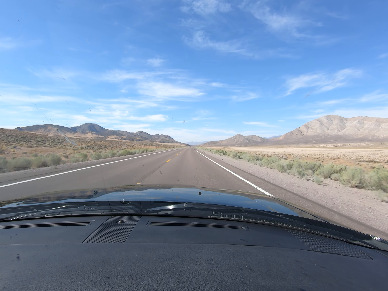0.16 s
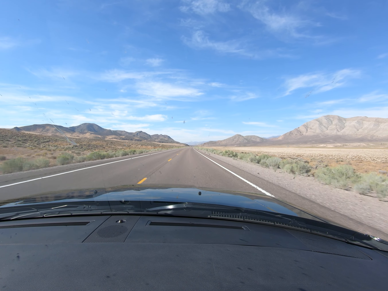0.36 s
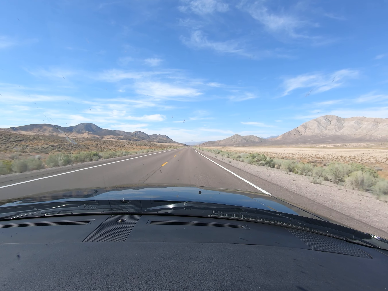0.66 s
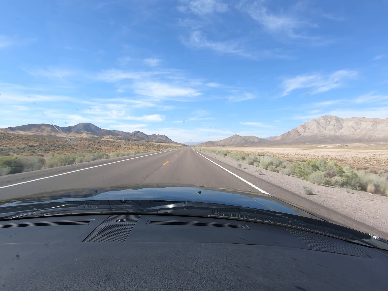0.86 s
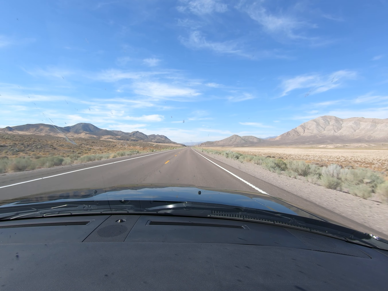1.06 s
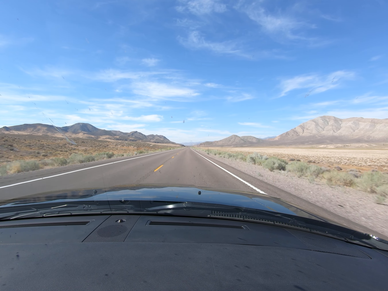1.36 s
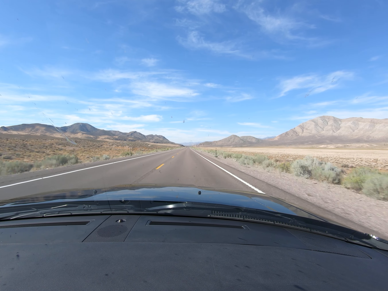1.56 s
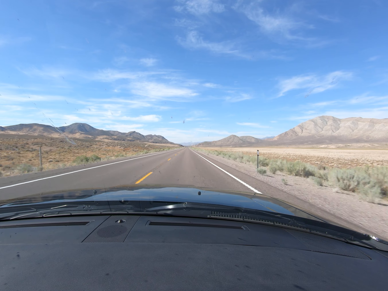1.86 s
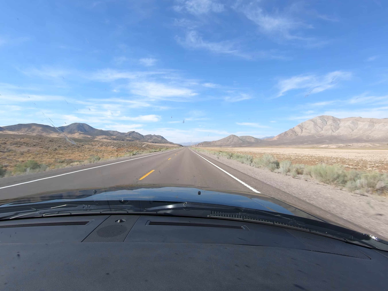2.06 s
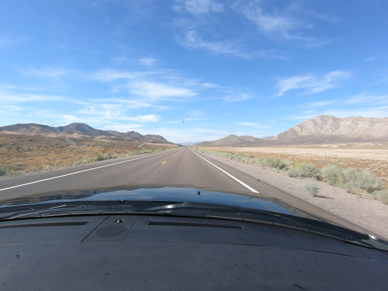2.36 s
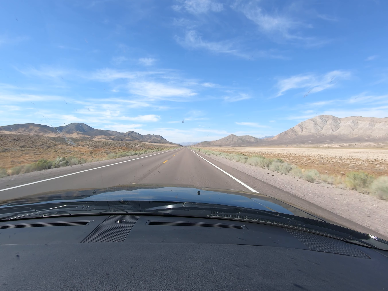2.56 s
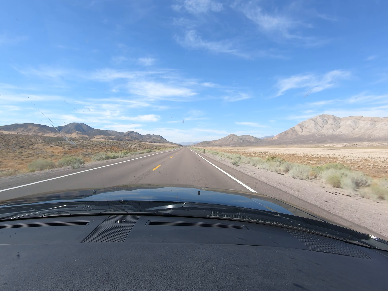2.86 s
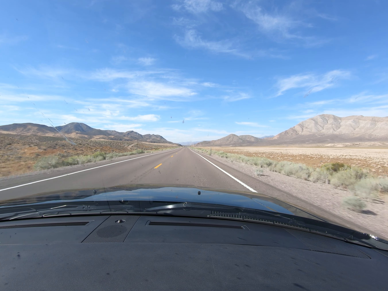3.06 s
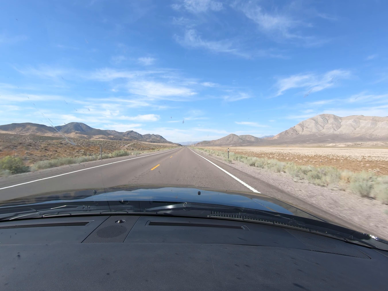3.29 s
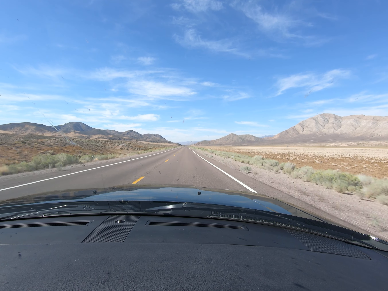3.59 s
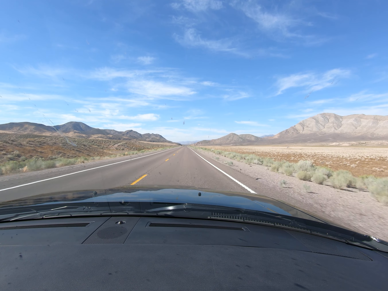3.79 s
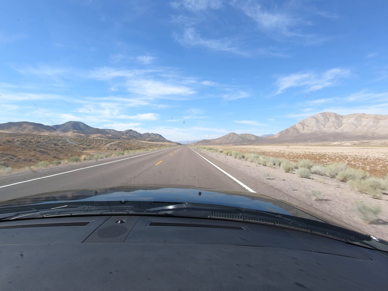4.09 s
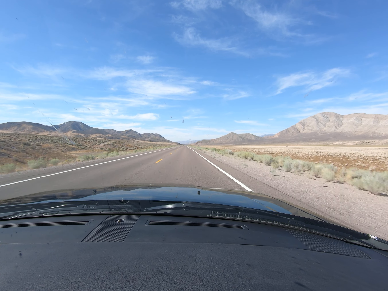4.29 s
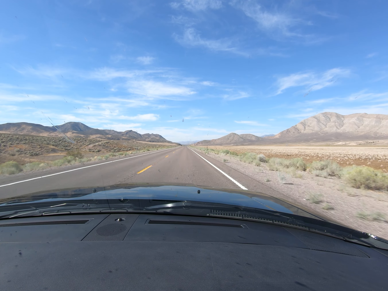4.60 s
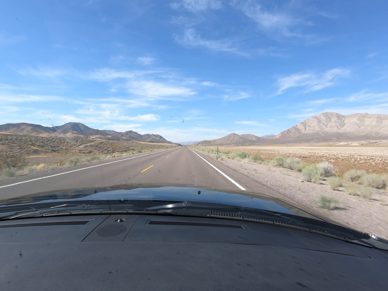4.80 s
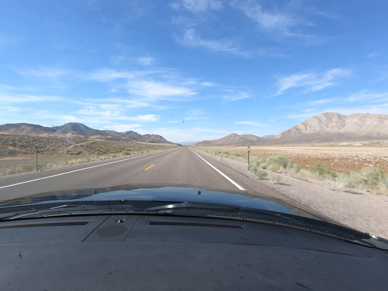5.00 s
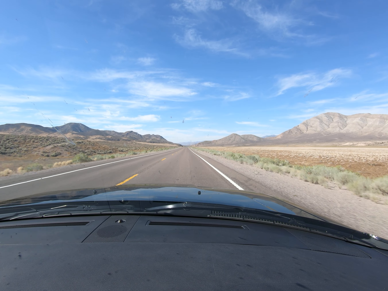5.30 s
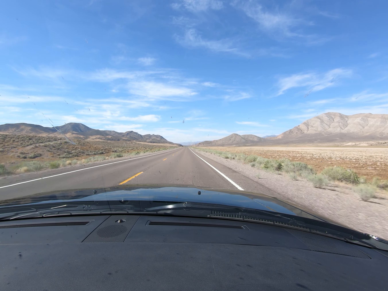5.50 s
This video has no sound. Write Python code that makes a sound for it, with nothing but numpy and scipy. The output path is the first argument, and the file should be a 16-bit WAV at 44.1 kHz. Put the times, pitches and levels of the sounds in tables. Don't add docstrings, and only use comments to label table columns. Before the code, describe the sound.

Continuous highway drive heard from the cabin: thick low rumble, muffled tyre roar and thin air hiss at the windscreen. The driver holds the throttle from about half a second to three seconds, adding a low engine hum with barely rising pitch, then lifts off. Hanging keys click faintly at the start, around two seconds and after the release; soft dash rubs follow past four seconds. Close, boxy sound with squeezed bass and dull, slightly thinned treble.

```python
import sys
import numpy as np
from scipy import signal
from scipy.fft import rfft, irfft, next_fast_len
from scipy.io import wavfile
from scipy.ndimage import uniform_filter1d, map_coordinates

SR = 44100
rng = np.random.default_rng(int(sys.argv[2]) if len(sys.argv) > 2 else 0)


def boost(x):
    u = np.asarray(x, float) / 20
    return 10 ** u


def inscribe(sig):
    pcm = np.round(np.clip(np.atleast_2d(sig).T, -1, 1) * 32767)
    wavfile.write(sys.argv[1], SR, pcm.astype(np.int16))


N = 249165

LIFT_S, PEDAL_S = 3.24, 0.35
CRUISE_HZ = 35.3


def clock():
    return np.arange(N) / SR


def unit(x):
    return x / np.sqrt(np.mean(x ** 2) + 1e-20)


def wobble(rate):
    knots = rng.standard_normal(int(N * rate / SR) + 4)
    return map_coordinates(knots, [np.arange(N) * rate / SR])


def noise(response):
    m = next_fast_len(N + 8192)
    spectrum = rfft(rng.standard_normal(m)) * response(np.fft.rfftfreq(m, 1 / SR))
    return unit(irfft(spectrum, m)[:N])


def coloured(points):
    f, db = np.transpose(points)
    return noise(lambda hz: boost(np.interp(np.log(hz + 1), np.log(f + 1), db, -120, -120)))


def patchy(x, patchy_db):
    z = signal.stft(x, nperseg=2048)[2]
    field = uniform_filter1d(rng.standard_normal(z.shape), size=8, axis=0)
    field = uniform_filter1d(field, size=11, axis=1)
    return unit(signal.istft(z * boost(patchy_db * unit(field)), nperseg=2048)[1][:N])


def tone(hz):
    return np.sqrt(2) * np.sin(2 * np.pi * (np.cumsum(hz) / SR + rng.random()))


def throttle():
    t = clock()
    press_s = 0.6
    return np.clip(0.5 + np.minimum(t - press_s, LIFT_S - t) / PEDAL_S, 0, 1)


def shaft():
    start_hz, gain_hz_per_s = 34.19, 0.615
    sag_hz, sag_s = 0.65, 0.55
    coast = np.maximum(clock() - LIFT_S + PEDAL_S / 2, 0)
    return start_hz + gain_hz_per_s * (clock() - coast) - sag_hz * (1 - np.exp(-coast / sag_s))


def asphalt():
    # time in seconds, length in seconds, jolt in dB, slap in dB.
    uneven_spots = [(0.122, 0.042, 1.5, 0), (0.521, 0.04, 9, -1), (0.686, 0.066, 2, -0.5),
                    (1.303, .1, 1.5, -0.6), (1.898, 0.12, 5.5, 0.5), (2.45, 0.11, 3.5, 0.5),
                    (2.9, 0.069, 1, 1.3), (3.339, 0.14, 1, 1.05), (4.15, 0.098, 1, 0.5),
                    (5.197, .1, 1.5, -1), (5.504, 0.13, 2, 2)]
    s, length, jolt_db, slap_db = np.transpose(uneven_spots)
    spots = np.exp(-((clock()[:, None] - s) / length) ** 2)
    return spots @ jolt_db, spots @ slap_db


def lull(x):
    middle_s, length_s, share = 0.45, 0.22, 0.7
    # lower edge in Hz, upper edge in Hz.
    panel_band = [335, 420]
    panel = signal.sosfiltfilt(signal.butter(2, panel_band, "band", fs=SR, output="sos"), x)
    return x - share * np.exp(-((clock() - middle_s) / length_s) ** 4) * panel


def road():
    # frequency in Hz, density in dB per Hz.
    thump_colour = [(7.1, -46.5), (12, -18.5), (25, -4.5), (37, -1), (64, -1), (77, -0.5), (90, -9.5),
                    (120, -43.5), (200, -120)]
    # frequency in Hz, density in dB per Hz.
    boom_colour = [(70, -43.5), (85, -7), (105, 3.5), (128, 1.5), (155, -6), (200, -6), (260, -10),
                   (330, -23), (380, -50)]
    # frequency in Hz, density in dB per Hz.
    roar_colour = [(180, -37), (300, -3.5), (328, -2), (404, -4.5), (464, -6), (589, -7), (644, -11.5),
                   (823, -14), (916, -18.5), (1250, -38.5), (1620, -57.5), (2750, -120)]
    jolt_db, slap_db = asphalt()
    pedal = throttle()
    thump_db = -22.5 + jolt_db + 0.33 * wobble(6.2)
    boom_db = -20.5 - 1.6 * pedal + 0.16 * jolt_db + 2.2 * slap_db + 0.43 * wobble(9.7)
    roar_db = -31 - 0.08 * pedal + 0.35 * (shaft() - CRUISE_HZ) + slap_db + 0.36 * wobble(14)
    thump = boost(thump_db) * coloured(thump_colour)
    boom = boost(boom_db) * coloured(boom_colour)
    roar = boost(roar_db) * patchy(coloured(roar_colour), patchy_db=0.9)
    return thump + lull(boom + roar)


def wheels():
    treads = 2.692
    floor_hz, floor_width_hz = 94.1, 5.5
    # time in seconds, hum in dB.
    floor_contact = [(0, -0.5), (.6, -1.5), (1.5, 0), (2.1, -4.5), (2.7, -0.5), (3.05, -1.5), (3.4, -2),
                     (3.9, 1.5), (4.05, -3.5), (4.2, 2.5), (4.42, -4), (4.58, 1.5), (5.05, 0.5),
                     (5.2, -3.5), (5.32, -3.5), (5.65, 2.5)]
    hum_hz = treads * shaft()
    resonance_db = -10 * np.log10(1 + ((hum_hz - floor_hz) * 2 / floor_width_hz) ** 2)
    hum_db = -19.5 - 3.5 * throttle() + resonance_db
    overtone_db = hum_db - 13.5 + 1.3 * asphalt()[1] + 2.2 * wobble(5)
    hum_hz = hum_hz * (1 + 0.012 * wobble(9))
    waver_db = np.interp(clock(), *np.transpose(floor_contact)) + 1.0 * wobble(6)
    return boost(hum_db + waver_db) * tone(hum_hz) + boost(overtone_db - 3) * tone(2 * hum_hz)


def engine():
    shaft_multiples = [2, 3, 4, 5, 6, 7, 8, 9, 10, 12, 13, 15, 19, 30.7]
    # dB at low revs, dB at middle revs, dB at high revs.
    order_levels = [(-28.5, -28.5, -32.5), (-26, -27.5, -25), (-25, -22.5, -24.5), (-37.5, -42, -38.5),
                    (-31.5, -33.5, -34), (-50, -34.5, -30), (-54.5, -44.5, -39.5), (-57.5, -47.5, -39),
                    (-50, -39, -39), (-47.5, -48, -50), (-50.5, -47, -44.5), (-53.5, -47, -51),
                    (-46, -45, -55), (-63, -62, -58.5)]
    rev_points = [34.6, 35.2, 36]
    overrun_db = -39.5
    shaft_hz = shaft()
    unsteady_hz = shaft_hz * (1 + 0.0015 * wobble(5.5))
    orders = np.zeros(N)
    for multiple, levels_db in zip(shaft_multiples, order_levels):
        order_db = np.interp(shaft_hz, rev_points, levels_db) + 1.5 * wobble(5)
        orders += boost(order_db) * tone(multiple * unsteady_hz)
    return (throttle() + boost(overrun_db)) * orders


def screen(x):
    # frequency in Hz, width in Hz, gain in dB.
    reflections = [(2230, 55, 2.5), (2440, 50, 2), (4450, 150, 1), (5200, 200, 1), (5670, 60, -5.5),
                   (5950, 150, 2), (6160, 35, -1.5), (6270, 60, 1.5), (6500, 40, -2), (6680, 70, 2.5),
                   (7270, 70, 3), (7720, 60, 1.5), (8170, 60, 1.5), (10450, 150, 1)]
    m = next_fast_len(N)
    hz = np.fft.rfftfreq(m, 1 / SR)
    gain_db = sum(db * np.exp(-((hz - c) / w) ** 2) for c, w, db in reflections)
    return irfft(rfft(x, m) * boost(gain_db), m)[:N]


def slot(c, w):
    return noise(lambda f: (f * w) ** 2 / ((c * c - f * f) ** 2 + (f * w) ** 2))


def wind():
    # frequency in Hz, density in dB per Hz.
    rush_colour = [(650, -22), (1100, -6), (1180, -8.5), (1930, -10), (2130, -13.5), (2380, -14),
                   (2470, -15), (2590, -10.5), (2950, -14.5), (3480, -14), (4800, -24.5), (6240, -52),
                   (10600, -120)]
    # frequency in Hz, density in dB per Hz.
    hiss_colour = [(2530, -24), (4300, -5.5), (5180, -1), (5870, -5), (7110, -6.5), (7940, -9.5),
                   (8480, -15), (9100, -20.5), (10100, -16.5), (10500, -13.5), (11300, -25), (12200, -23.5),
                   (13500, -28), (14300, -35), (15700, -45)]
    # frequency in Hz, width in Hz, level in dB,
    # best shaft speed in Hz, range of shaft speed in Hz.
    slots = [(2515, 71, -65, 35.3, 2.2), (2663, 250, -66, 35.8, .9), (2840, 65, -66, 34.75, .4)]
    shaft_hz = shaft()
    speed_db = 0.4 * (shaft_hz - CRUISE_HZ) + 0.35 * wobble(0.44)
    gust = wobble(20)
    rush = boost(-52 + speed_db + 0.18 * gust) * coloured(rush_colour)
    hiss = boost(-65.5 + speed_db + 0.44 * gust + 0.55 * wobble(30)) * coloured(hiss_colour)
    air = screen(rush + hiss)
    for c, w, db, best_hz, range_hz in slots:
        whistle_db = db + 0.8 * wobble(1.9) - 6 * ((shaft_hz - best_hz) / range_hz) ** 2
        air = air + boost(whistle_db) * slot(c, w)
    return air


def keys():
    # frequency in Hz, 60 dB decay in seconds.
    key_modes = [(6440, 0.036), (8150, .04), (9350, .045), (10440, .03), (12400, .04), (15070, .045)]
    # start in seconds, level in dB, struck pitch in Hz, spread in octaves,
    # scrape in dB.
    contacts = [(.106, -68, 12000, .1, -80), (.117, -47, 6440, .2, -65), (.123, -50, 6440, .2, -74),
                (.138, -60, 15070, .08, -67), (.139, -62, 12400, .15, -76), (.142, -61, 9350, .08, -78),
                (.203, -66, 8150, .1, -72), (2.045, -62, 8150, .1, -84), (2.053, -63, 8150, .1, -84),
                (3.535, -68, 10440, .08, -76), (3.545, -64, 12400, .12, -62),
                (3.5455, -64, 15070, .08, -80), (3.550, -63, 10440, .1, -72), (3.551, -57, 6440, .1, -80),
                (3.556, -61, 6440, .1, -84), (3.556, -66, 12400, .08, -84)]
    # frequency in Hz, density in dB per Hz.
    scrape_colour = [(5500, -30.5), (6300, -4.5), (9000, -3.5), (12500, -3.5), (13500, -11), (15300, -10),
                     (15800, -36.5)]
    out = np.zeros(N + SR)
    t = np.arange(SR // 8) / SR
    grit = coloured(scrape_colour)
    for s, db, struck_hz, spread, scrape_db in contacts:
        start = round(s * SR)
        sound = boost(scrape_db - 60 * t / 0.054) * grit[start:][:len(t)]
        for hz, t60 in key_modes:
            level_db = db - 6 * (np.log2(hz / struck_hz) / spread) ** 2 + rng.normal(0, 1.6)
            sound = sound + boost(level_db - 60 * t / t60) * np.sin(2 * np.pi * hz * t)
        out[start:][:len(t)] += sound * (1 - np.exp(-t / 0.00061))
    return out[:N]


def dash():
    # time in seconds, level in dB, length in seconds.
    rustles = [
        (.12, -53, .008),
        (2.187, -57, .002),
        (4.232, -53.5, .007),
        (4.249, -50.5, .004),
        (4.25, -59, .05),
        (4.328, -53, .005),
        (4.59, -54, .025),
        (4.685, -56, .008),
    ]
    # frequency in Hz, density in dB per Hz.
    trim_colour = [(600, -30), (1000, -6), (1600, -2.5), (4000, -13), (5300, -15), (7500, -22), (8500, -24),
                   (9200, -45)]
    swell = sum(boost(db) * np.exp(-((clock() - s) / length) ** 2) for s, db, length in rustles)
    return coloured(trim_colour) * swell


def sizzle():
    # time in seconds, tyre sizzle in dB.
    coarseness = [(0, -42.5), (.6, -43.5), (1.3, -43.5), (1.9, -43.5), (2.4, -41.5), (3.1, -42),
                  (3.5, -43.5), (4, -44), (4.4, -46.5), (4.8, -43.5), (5.3, -45), (5.65, -43.5)]
    # frequency in Hz, density in dB per Hz.
    sizzle_colour = [(600, -31.5), (800, -0.5), (950, -2.5), (1100, -10), (1350, -14), (1700, -21),
                     (2200, -45.5)]
    s, db = np.transpose(coarseness)
    grain_db = np.interp(clock(), s, db)
    mean_db = grain_db.mean()
    return boost(mean_db - 4.5 + 2.2 * (grain_db - mean_db)) * coloured(sizzle_colour)


def axle():
    moan_hz = 3.6 * shaft() * (1 + 0.03 * wobble(2.5))
    return boost(-31.5 - 7 * throttle() + 2.5 * wobble(5)) * tone(moan_hz)


def scene():
    return (road() + wheels() + engine() + wind() + keys() + dash() + sizzle() + axle())[None]


def squeeze(x):
    bass = signal.sosfiltfilt(signal.butter(2, 420, fs=SR, output="sos"), x)
    envelope = np.abs(signal.hilbert(bass[0], next_fast_len(N))[:N])
    swell = uniform_filter1d(envelope, round(0.005 * SR))
    gain = boost(2.0) * (1 + (swell / boost(-9.5)) ** 6) ** -0.15
    return bass * gain + (x - bass) * gain ** 0.31


def ease_ends(x):
    open_level, close_level, edge_s = 0.28, 0.08, 0.003
    t = clock()
    opening = (open_level - x[:, :1]) * np.exp(-(t / edge_s) ** 2)
    closing = (close_level - x[:, -1:]) * np.exp(-(t[::-1] / edge_s) ** 2)
    return x + opening + closing


def quiet(hz, z, centre_hz, half_hz):
    peak = np.abs(z[np.abs(hz - centre_hz) < half_hz]).max(0)
    return peak < boost(9) * np.median(peak)


def treble_dropouts(x):
    # frequency in Hz, half width in Hz, share of the time (0-1).
    dropout_bands = [(8850, 110, .5), (9150, 130, .3), (9450, 130, .2), (9750, 130, .12), (10950, 130, .25),
                     (11200, 110, .25), (11450, 130, .2), (12800, 150, .12), (13150, 180, .2),
                     (13550, 200, .35), (13950, 200, .7), (14300, 170, .85), (15150, 700, 1)]
    # start in seconds, length in seconds.
    comb_stretches = [(.02, .09), (.26, .06), (.38, .02), (.475, .025), (.69, .06), (.81, .025),
                      (1.01, .02), (1.76, .025), (2.15, .025), (2.26, .02), (2.455, .025), (2.545, .02),
                      (2.6, .025), (2.8, .02), (3.07, .025), (3.37, .025), (3.52, .02), (3.61, .025),
                      (4.05, .07), (4.5, .04), (4.62, .02), (4.74, .025), (5.14, .09), (5.29, .03),
                      (5.36, .02)]
    hz, t, z = signal.stft(x, SR, nperseg=1024, boundary="odd", padded=False)
    kept = np.ones(z.shape[1:])
    for c, half, share in dropout_bands:
        ranks = np.argsort(np.argsort(uniform_filter1d(rng.random(len(t)), size=2)))
        dropped = (ranks / len(t) < share) & quiet(hz, z[0], c, half)
        kept[np.ix_(np.abs(hz - c) < half, dropped)] = 0.06
    lost = signal.istft(z * (1 - kept), SR, nperseg=1024)[1]
    lost = np.pad(lost, ((0, 0), (0, 1024)))[:, :N]
    on = sum((clock() > s) & (clock() < s + length) for s, length in comb_stretches)
    ticks = on * (np.arange(N) % 256 == 0) * boost(-62 + 3 * rng.standard_normal(N))
    comb = signal.sosfilt(signal.butter(4, [12000, 15800], "band", fs=SR, output="sos"), ticks)
    return x - lost + comb


def roll_off(x):
    return signal.sosfilt(signal.butter(12, 15690, fs=SR, output="sos"), x)


def record(dry):
    mix = treble_dropouts(ease_ends(squeeze(dry)))
    return roll_off(mix)


dry = scene()
out = record(dry)
inscribe(out)
```